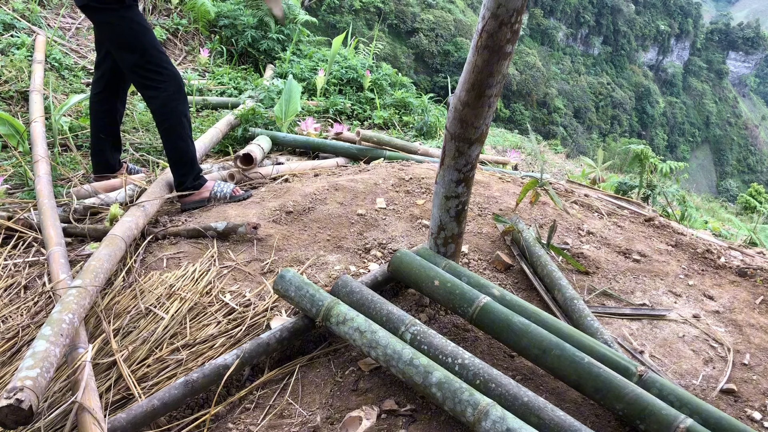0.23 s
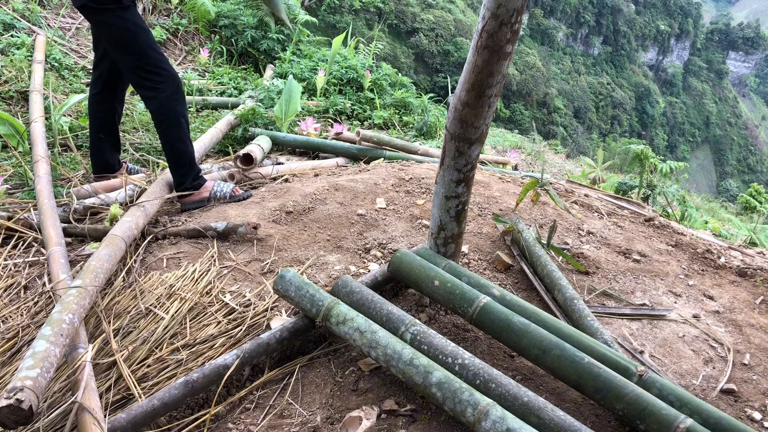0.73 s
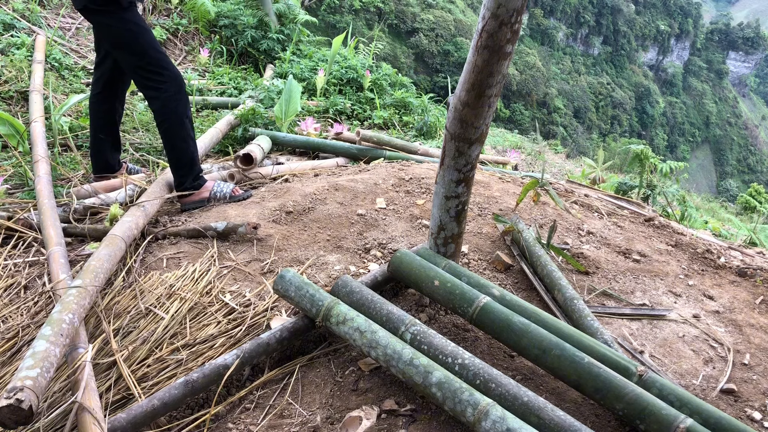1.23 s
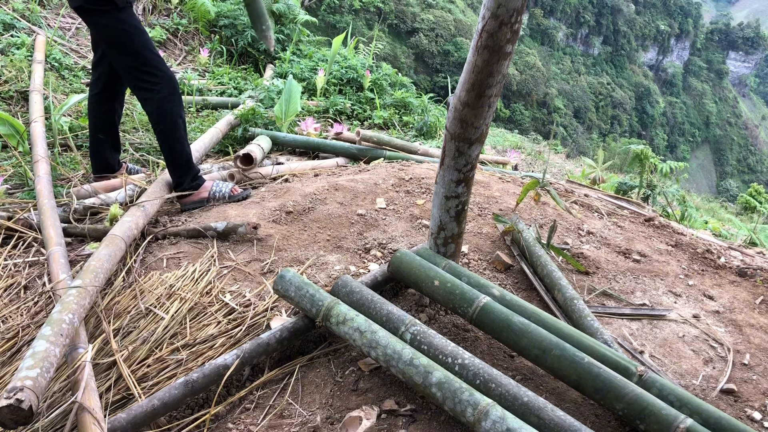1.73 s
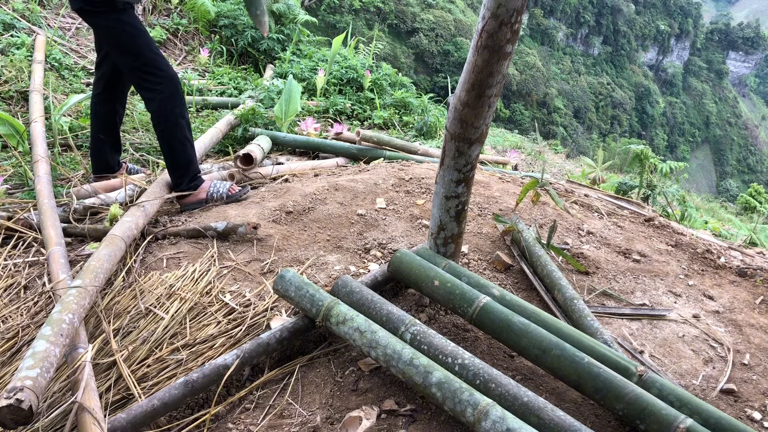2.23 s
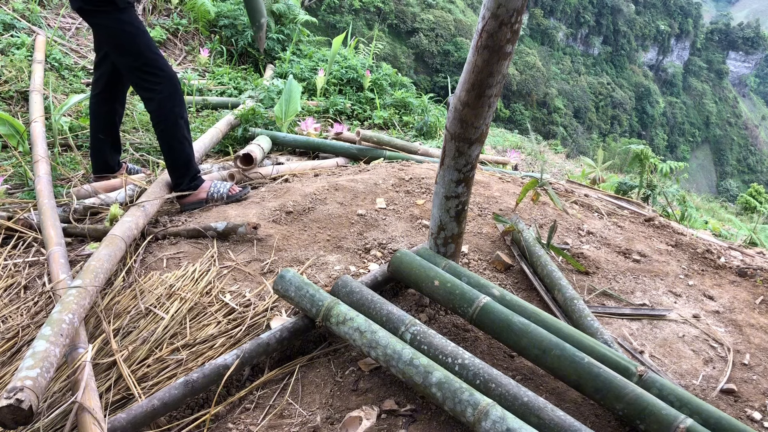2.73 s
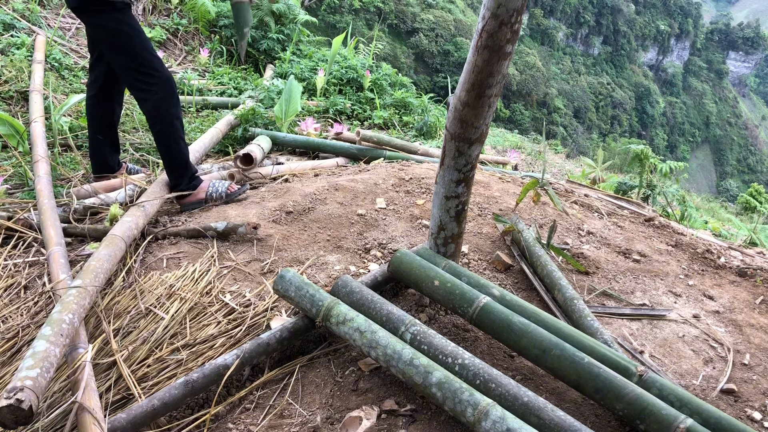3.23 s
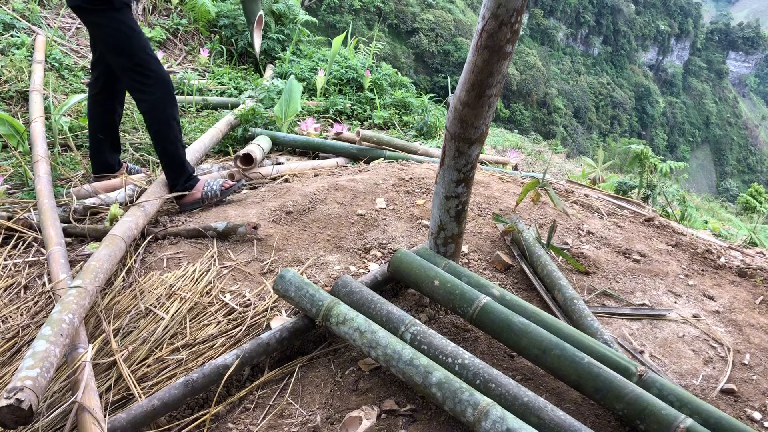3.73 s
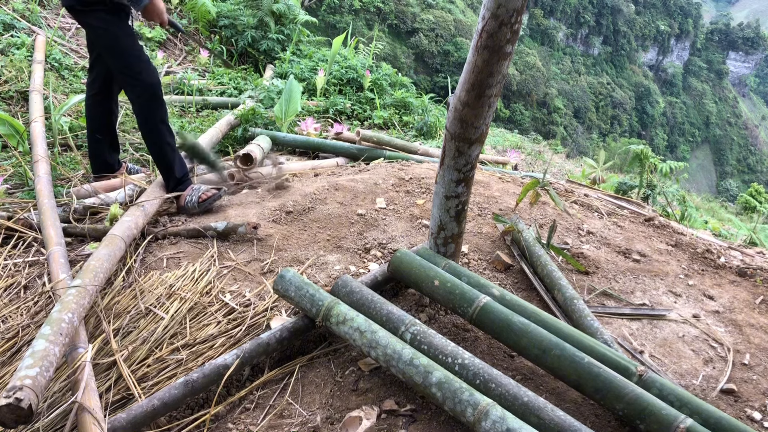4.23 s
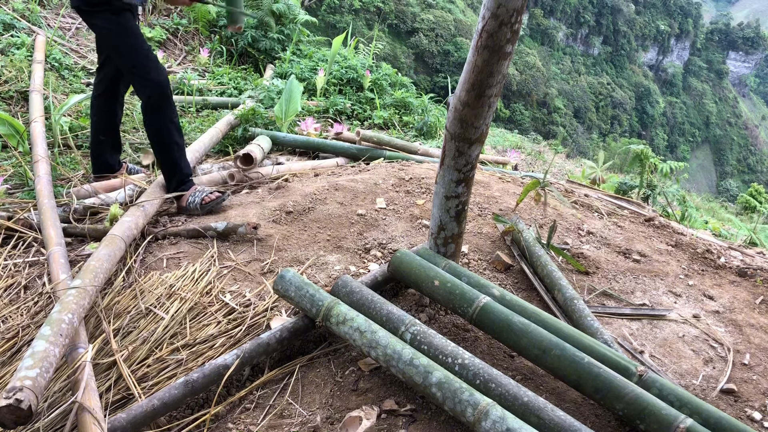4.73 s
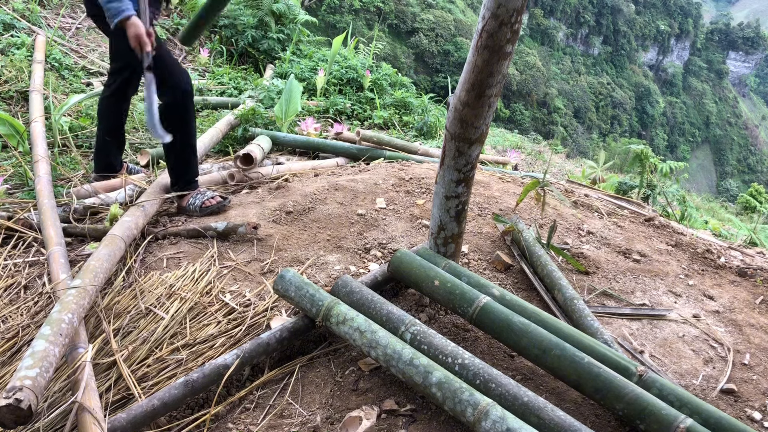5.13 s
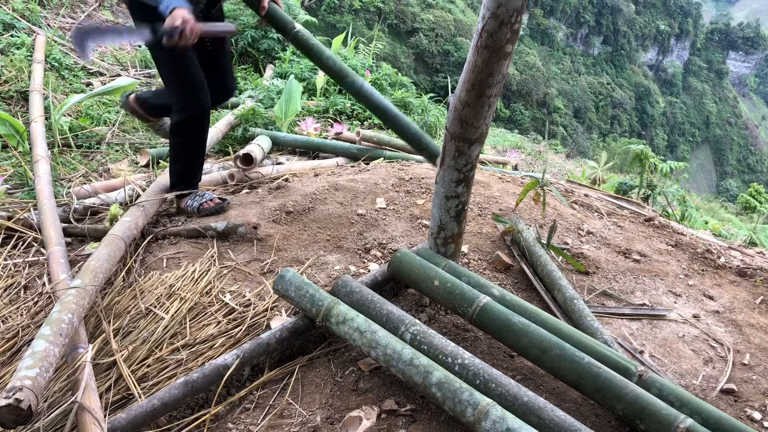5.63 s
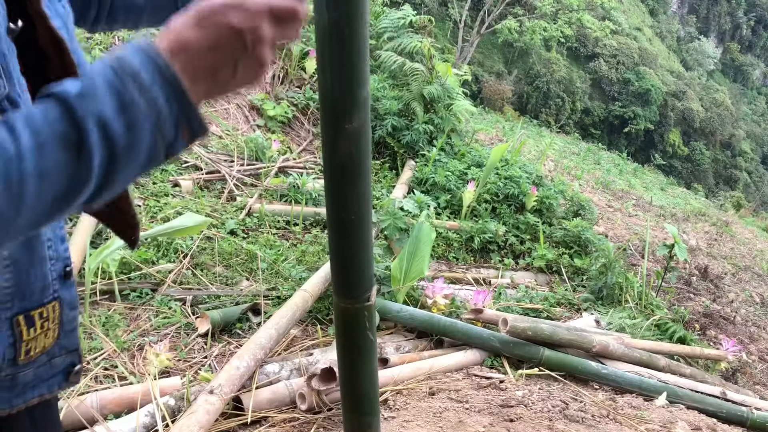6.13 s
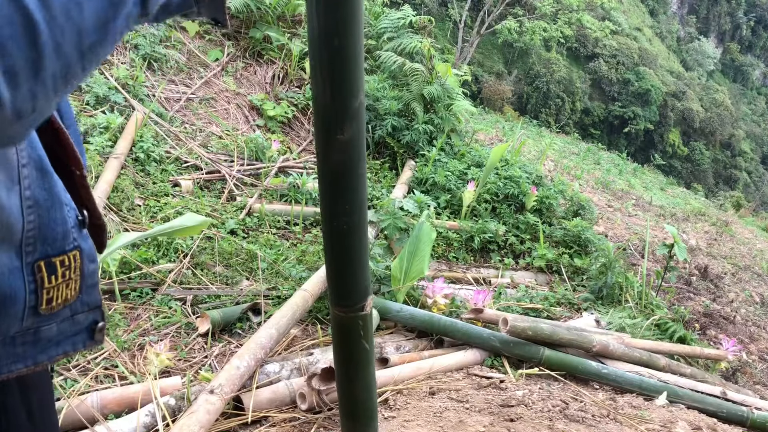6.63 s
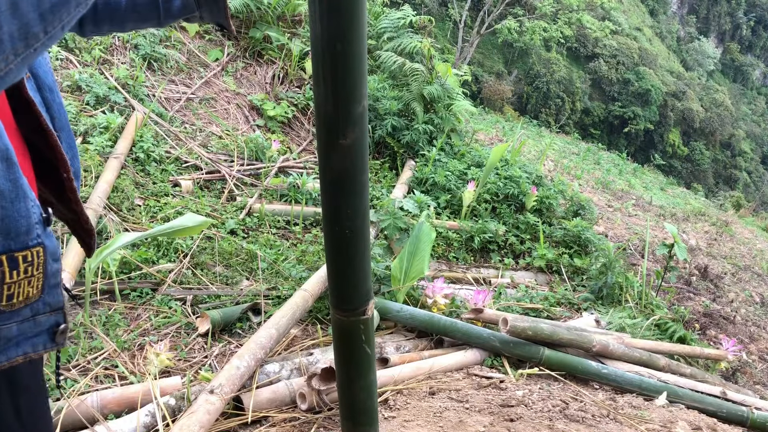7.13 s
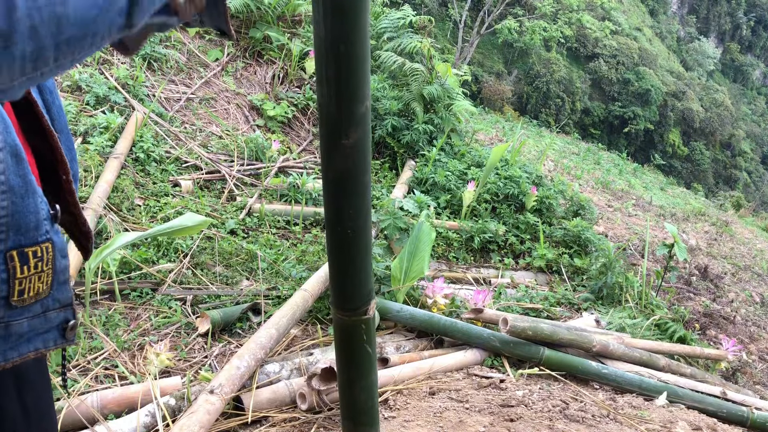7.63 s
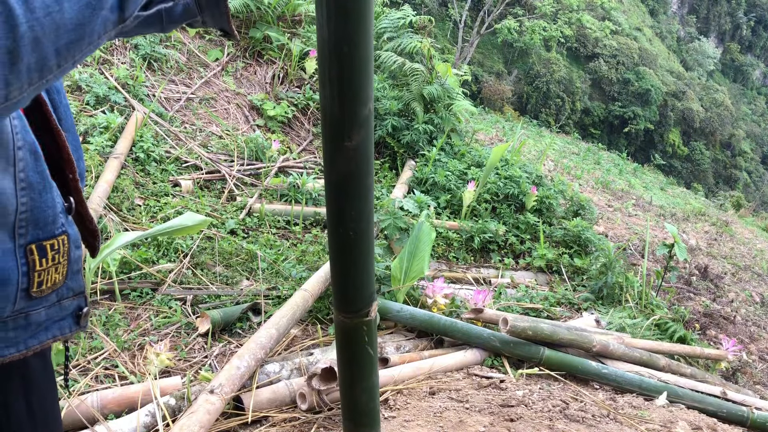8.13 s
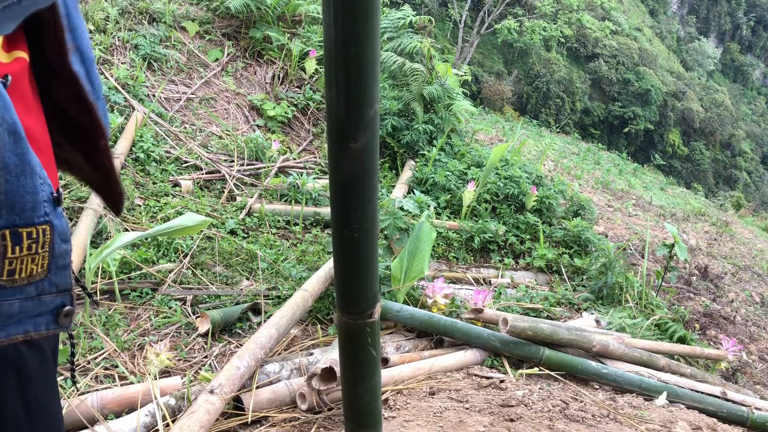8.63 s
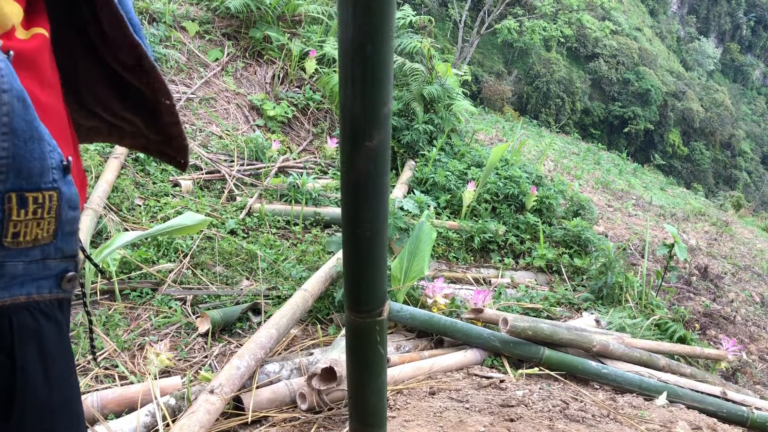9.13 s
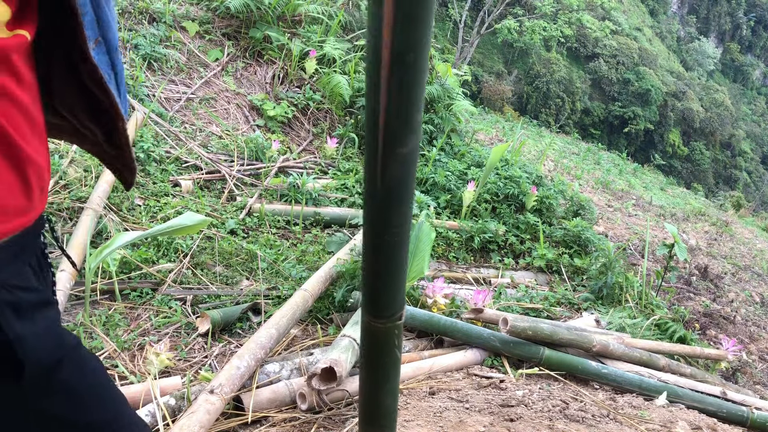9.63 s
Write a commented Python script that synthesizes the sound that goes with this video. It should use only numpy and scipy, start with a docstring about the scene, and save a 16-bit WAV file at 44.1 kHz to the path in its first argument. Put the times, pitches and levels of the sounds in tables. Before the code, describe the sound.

On an open hillside, a long knife chops green bamboo five times, about once a second, each blow a sharp crack with a hollow ring. A cut piece drops and bounces, a faint rooster crows far away and a pole drags briefly. After a lighter, closer chop and a flurry of birdsong, a second pole splits in bursts of snapping fibres. An insect trills faintly and wind puffs on the microphone.

```python
"""On an open hillside, wind puffs on the microphone and an insect trills. A long knife chops green bamboo:
the blade bites, the wall cracks, the hollow tube booms. Leaves rustle among small dry ticks, a songbird
whistles and a fly buzzes past. The fifth chop frees a piece that drops and bounces; a far rooster crows,
and a pole lands and drags on the pile. After a lighter, closer chop and a flurry of birdsong,
a second, upright pole is notched, then splits in a tearing run of snapping fibres."""
import sys
import numpy as np
from scipy import signal
from scipy.fft import rfft, irfft, next_fast_len
from scipy.io import wavfile
from scipy.ndimage import uniform_filter1d, map_coordinates

SR = 44100
rng = np.random.default_rng(int(sys.argv[2]) if len(sys.argv) > 2 else 0)


def inscribe(sig):
    """Save sig as 16-bit PCM at rate SR to the path in sys.argv[1].

    A 1-D sig is mono; a 2-D sig holds one channel per row.
    Samples are clipped to [-1, 1] before scaling.
    """
    pcm = np.round(np.clip(np.atleast_2d(sig).T, -1, 1) * 32767)
    wavfile.write(sys.argv[1], SR, pcm.astype(np.int16))


N = 435708
TIME = np.arange(N) / SR
AFTER = np.arange(SR // 2) / SR  # seconds after a blow

# noise colours: f/Hz, density/dB
WIND_COLOUR = [(15, -33), (30, -15.5), (60, -1), (130, -8), (250, -19.5), (500, -70.5)]  # low buffeting
VALLEY_COLOUR = [(80, -37.5), (150, 2), (500, -3.5), (1400, -11.5), (6000, -22.5), (9000, -48)]  # distant murmur
CRACK_COLOUR = [(250, -34.5), (500, -10.5), (1300, -10.5), (1900, -12.5), (3500, -9), (5500, -14.5),
                (8000, -24.5), (12000, -72.5)]  # body of a crack
SIZZLE_COLOUR = [(3200, -30.5), (5500, -11), (7500, -3), (10000, -9), (13500, -8), (15300, -8),
                 (16000, -14.5), (16900, -37.5)]  # its splintery top
NEAR_SIZZLE_COLOUR = [(3000, -27.5), (7000, -6.5), (11000, -6.5), (15000, -3.5), (15800, -2), (16600, -41)]  # that top, close by
LEAF_COLOUR = [(400, -27), (900, 1), (5000, -3.5), (10000, -4.5), (15300, 2), (15800, -3), (16000, -59.5)]  # near leaves
FOLIAGE_COLOUR = [(1500, -18.5), (4000, 0.5), (15800, -4), (16000, -56)]  # far foliage

# ringing modes: f/Hz, level/dB, t60/s
POLE_MODES = [(296, -3, 0.14), (569.7, -2.5, 0.052), (782, -8, 0.05), (910, -6.5, 0.068), (1190, -4, 0.061),
              (1312, -0.5, 0.1)]  # wall of the chopped pole
BLADE_MODES = [(4300, -3, 0.098), (6200, 0, 0.16), (9500, -5, 0.26), (10720, -3.5, .16), (11800, -5.5, .18),
               (13360, -12.5, .15)]  # steel of the knife
COLUMN_MODES = [(124, 0, .45)]  # air in the hollow pole
LOOSE_MODES = [(205.2, -7, 0.25), (382.2, -3.5, 0.25), (500, -5, 0.15), (589, -7, 0.32), (820, -3.5, 0.092),
               (1214, -5.5, 0.18)]  # loose, cut bamboo
UPRIGHT_MODES = [(155.7, -21, 0.43), (422, -9.5, 0.14), (732, -11.5, 0.0896), (963, 0.5, 0.04),
                 (1196, -4, 0.104), (1669, -5, 0.063)]  # wall of the upright pole

# ambience faders: t/s, wind/dB, valley/dB
AIR_LEVELS = [(0, -65, -68.5), (4.5, -72.5, -66), (6, -74.5, -68.5), (8.9, -75, -69.5), (9.5, -89, -59),
              (9.88, -54.5, -68.5)]
# eddies hitting the microphone: peak t/s, level/dB, width/s
WIND_PUFFS = [(0.299, -39, 0.019), (.76, -51.5, 0.025), (4.389, -50, 0.016), (6.106, -49, 0.014),
              (6.799, -42, 0.011), (6.867, -47.5, 0.0078), (6.948, -44.5, 0.022), (7.626, -32.5, 0.012),
              (9.75, -48.5, 0.019)]
# insect bouts: start/s, end/s, level/dB
TRILL_BOUTS = [(.001, 0.331, -63.5), (1.25, 3.27, -64), (3.753, 4.33, -69), (5.394, 5.9, -71),
               (6.325, 8.086, -66.5), (8.738, 9.1, -67)]
# full swings: t/s, level/dB, treble over level/dB, lead of the first touch/s, air column/dB
KNIFE_CHOPS = [(0.2037, -11, -6.5, .0182, -32), (1.1558, -11.5, -4.5, .0168, -29.5),
               (2.1279, -12, -5.5, .0203, -33), (3.0338, -11, -6, .0185, -33),
               (3.961, -12.5, -3, 0.019, -22), (7.3194, -23, 0, .002, -33.5)]
# light blade contacts: t/s, crack/dB, treble/dB, steel/dB
KNIFE_TAPS = [(0.2503, -36.5, -31, -79), (0.6964, -56.5, -51.5, -66.5), (2.506, -49, -50, -62.5),
              (3.3368, -48, -43, -63), (3.384, -39.5, -66, -65), (3.3997, -48, -48.5, -52.5)]
# leaves and bark brushed: start/s, peak/s, end/s, level/dB
LEAF_SWELLS = [(0.293, 0.389, 1.23, -66.5), (1.236, 1.337, 2.1, -65), (2.176, 2.451, 2.45, -60),
               (3.103, 3.25, 3.4, -61), (4.078, 4.104, 4.57, -56), (4.56, 4.633, 4.98, -57),
               (5.18, 5.314, 6.1, -66), (5.945, 6.082, 7.1, -68), (8.84, 8.952, 22, -66.5),
               (9.15, 9.37, 10.33, -52.5)]
# small dry ticks of light knife nicks, chips and twigs: t/s, crack/dB, treble/dB
DRY_TICKS = [(0.327, -46.5, -54), (1.0413, -49, -49.5), (2.41, -39, -72), (2.448, -52, -64),
             (2.722, -52.5, -70), (3.305, -44, -71), (3.486, -50.5, -72), (4.079, -36.5, -45),
             (4.0903, -37, -45), (4.1118, -35, -36), (4.607, -41, -51.5), (4.8173, -46, -48.5),
             (6.068, -32, -41)]
# bird notes that dip and come back: t/s, length/s, edge f/Hz, lowest f/Hz, level/dB
BIRD_DIPS = [(0.478, 0.18, 3480, 2630, -72), (7.985, 0.099, 3300, 2600, -75)]
# bird notes that glide and settle: t/s, length/s, from f/Hz, to f/Hz, level/dB
BIRD_GLIDES = [(1.902, 0.027, 5040, 5100, -67), (6.731, 0.056, 3750, 3810, -72.5),
               (6.984, 0.04, 3020, 3500, -67), (7.343, 0.081, 3880, 4260, -56),
               (7.589, 0.042, 6750, 3840, -57.5), (7.689, 0.079, 6200, 2330, -62),
               (7.761, 0.042, 7160, 3950, -57.5), (7.83, 0.036, 6570, 2220, -65.5),
               (7.949, 0.048, 2710, 3790, -61), (8.01, 0.055, 6550, 2400, -60),
               (8.13, 0.061, 2320, 3950, -63.5), (8.209, 0.027, 4130, 2610, -73),
               (8.284, 0.018, 4720, 2830, -69), (8.313, 0.018, 3900, 5510, -68)]
# bird warbles: level/dB, then turning points (t/s, f/Hz)
BIRD_WARBLES = [(-59, (7.17, 3900), (7.187, 4150), (7.203, 3200), (7.235, 4500)), (-56, (7.452, 4500),
                (7.472, 4700), (7.49, 3300), (7.525, 2800)), (-58, (7.618, 4800), (7.643, 5200),
                (7.661, 2900), (7.68, 4000), (7.70, 2500)), (-60, (7.868, 6300), (7.888, 4800),
                (7.903, 5300), (7.92, 3400), (7.942, 2600))]
# fly passes: start/s, end/s, wingbeat from f/Hz, to f/Hz, level/dB
FLY_PASSES = [(0.805, 1.132, 290.5, 299, -77.5), (3.681, 3.732, 334, 310, -59.5),
              (3.749, 3.968, 292, 351, -63), (8.008, 8.425, 265.7, 269, -75.5),
              (8.683, 9.097, 274.4, 253, -72.5)]
# hollow bamboo knocks: a cut piece drops and bounces, then a pole lands on the pile:
# t/s, crack/dB, wall/dB, favoured f/Hz, share of full ring time
HOLLOW_KNOCKS = [(3.963, -52, -19, 413, 0.9), (4.2431, -24.5, -15.5, 386, 0.66),
                 (4.3065, -46.5, -29, 296, 0.61), (4.4992, -50, -36.5, 500, 0.76),
                 (4.701, -51, -45, 695, 0.39), (5.696, -49.5, -44, 652, 0.5)]
# a pole dragged over the pile: start/s, end/s, level/dB
POLE_DRAG = (5.68, 5.905, -56)
# the far crow: t/s, f/Hz, level/dB, third partial over the first/dB
CROW_CONTOUR = [(5.02, 490, -72, -16), (5.07, 500, -67, -19), (5.12, 505, -76, -6), (5.21, 512, -72, 7),
                (5.29, 515, -74, -4), (5.55, 530, -72, -12), (5.7, 510, -72, -1), (5.9, 445, -70, -18)]
# notches and snaps in the upright pole: t/s, crack/dB, treble/dB
UPRIGHT_SNAPS = [(8.4165, -48.5, -47.5), (8.4401, -41, -39), (8.7924, -38.5, -45.5), (8.799, -22, -24.5),
                 (9.109, -23.5, -22), (9.1154, -28.5, -30), (9.1235, -35.5, -29.5), (9.1341, -21, -26),
                 (9.1545, -22, -19), (9.189, -26.5, -30.5), (9.2307, -21.5, -26), (9.4952, -37, -42),
                 (9.5262, -29.5, -30.5), (9.5329, -24.5, -19.5), (9.5387, -20.5, -21), (9.556, -24, -27),
                 (9.571, -28, -26), (9.59, -27.5, -20.5), (9.612, -26.5, -22)]
# the running split: start/s, end/s, start level/dB, end level/dB, groan f/Hz, groan/dB
UPRIGHT_TEARS = [(8.801, 8.875, -22, -50, 420, -39.5), (9.155, 9.233, -28, -30, 207, -31.5),
                 (9.535, 9.59, -27, -32.5, 262, -40.5), (9.43, 9.52, -60, -51.5, 250, -43.5)]

CHIRPS_PER_S = 48.7
# over the level of the swing: the first touch of the edge, then the full bite
TOUCH_DB, TOUCH_TREBLE_DB, TOUCH_WALL_DB, TOUCH_STEEL_DB = -24.5, -15.5, -43, -34
CHOP_WALL_DB, CHOP_STEEL_DB = -6, -39.5
TAP_WALL_DB, SPLIT_WALL_DB = -9.5, -5.5  # over the crack
FLY_SECOND_DB, ROOSTER_SECOND_DB = -8.5, -6  # second partial over the first
LANDS_S, LANDED_T60 = 4.078, 0.086  # the freed piece meets the ground and its ring is choked
CLOSE_FROM_S = 5.92  # from here on the chopping is close to the microphone
LOW_CUT_HZ, TOP_HZ = 30, 16900


def amp(db):
    """Decibels to linear gain."""
    return 10 ** (np.asarray(db) / 20)


def unit(x):
    """Scale to rms 1."""
    return x / np.sqrt(np.mean(x ** 2) + 1e-20)


def ramp(seconds):
    """A straight rise from 0 to 1."""
    return np.linspace(0, 1, round(seconds * SR))


def curves(rows):
    """Automation: one value per sample for each column after the time."""
    times, *columns = np.transpose(rows)
    return [np.interp(TIME, times, column) for column in columns]


def wobble(rate):
    """A smooth random curve, rate knots a second."""
    return map_coordinates(rng.standard_normal(int(N * rate / SR) + 4), [TIME * rate])


def noise(colour, size, patchy_db=0):
    """Coloured noise of rms 1, with patches of random gain across time and frequency."""
    cells = signal.stft(rng.standard_normal(size + 1024), nperseg=512)[2]
    patches = uniform_filter1d(uniform_filter1d(rng.standard_normal(cells.shape), 6, 0), 10, 1)
    patchy = signal.istft(cells * amp(patchy_db * unit(patches)), nperseg=512)[1][:size]
    knots_hz, db = np.transpose(colour)
    padded = next_fast_len(size)
    hz = np.fft.rfftfreq(padded, 1 / SR)
    eq = amp(np.interp(np.log(hz + 1), np.log(knots_hz + 1), db))
    return unit(irfft(rfft(patchy, padded) * eq, padded)[:size])


def add(track, s, sound):
    """Mix a sound in at time s."""
    part = track[max(round(s * SR), 0):][:len(sound)]
    part += sound[:len(part)]


def air():
    """The bed: wind buffeting the microphone over the murmur of the valley."""
    wind_db, valley_db = curves(AIR_LEVELS)
    wind = amp(wind_db + 5 * wobble(13) + 1.3 * wobble(10)) * noise(WIND_COLOUR, N)
    valley = amp(valley_db + 0.87 * wobble(4.9)) * noise(VALLEY_COLOUR, N, patchy_db=2)
    t = np.arange(-SR // 10, SR // 10) / SR
    for s, db, width in WIND_PUFFS:  # an eddy pushes the diaphragm for a cycle or two
        push = np.sin(8.8 * t / width) + 0.82 * noise(WIND_COLOUR, len(t))
        add(wind, s + t[0], amp(db) * np.exp(-(t / width) ** 2) * push)
    return wind + valley


def insect():
    """Each wing stroke is a short falling chirp; far neighbours blur to a thin hum."""
    out, u = np.zeros(N), ramp(0.016)
    for start, end, db in TRILL_BOUTS:
        for s in np.arange(start, end, 1 / CHIRPS_PER_S):
            # bouts after the first swell in and climb to pitch
            swell = min(1, 0.3 + (s - start) / 0.29) if start > .1 else 1
            sweep_hz = 7200 + 600 * swell - (500 + 700 * swell) * u ** 1.2
            phase = 2 * np.pi * (np.cumsum(sweep_hz) / SR + rng.random())
            add(out, s, swell * amp(db + rng.normal(0, 2.3)) * np.sin(np.pi * u) * np.sin(phase))
    neighbours = amp(-89 + 2.5 * wobble(3)) * noise([(6200, -50), (6900, 0), (7600, -50)], N)
    return out + neighbours


def trees(x, t60, wet_db):
    """Add the smear that trunks and leaves scatter back."""
    tail = rng.standard_normal(len(AFTER)) * amp(-60 * AFTER / t60)
    return x + amp(wet_db) * signal.fftconvolve(x, tail / np.linalg.norm(tail))[:N]


def ring(modes, cycles, rough):
    """Damped modes build over some cycles, anew each blow; wet fibre roughens phase and pitch."""
    out = 0
    for hz, db, t60 in modes:
        drift = rough * np.cumsum(rng.standard_normal(len(AFTER))) * np.sqrt(hz / SR)
        phase = 2 * np.pi * hz * rng.normal(1, 0.012 * rough) * AFTER + drift
        attack = 1 - np.exp(-AFTER * hz / cycles)
        decay = amp(rng.normal(db, 2.5) - 60 * AFTER / t60)
        out = out + attack * decay * np.sin(phase)
    return out


def splinters(size, per_s, life_s):
    """A crackling gain: fibres snap at random, each dying fast, over a steady fraying."""
    snaps = (rng.random(size) < per_s / SR) * rng.uniform(0, 1.5, size=size)
    return 0.66 + 0.98 * signal.lfilter([1], [1, -np.exp(-1 / (life_s * SR))], snaps)


def crack(db, treble_db, t60, sizzle=SIZZLE_COLOUR):
    """The edge sinks in, fibres part in a spike and splinter on, treble dying first."""
    bite = np.clip(AFTER / 0.0011, 0, 1) ** 2
    spike = amp(6.5 - 60 * AFTER / 0.0044)
    fray = splinters(len(AFTER), per_s=90, life_s=0.0058)
    fall_db = -60 * AFTER / t60
    scatter = amp(-46.5 - 60 * AFTER / 0.98)  # the hillside sends a little back
    body_shape = spike + fray * (amp(fall_db) + amp(-5 + fall_db / 3.2)) + scatter
    top_shape = 2.6 * spike + fray * (amp(fall_db / 0.73) + amp(-13.5 + fall_db / 3.8))
    body = amp(db - 6) * body_shape * noise(CRACK_COLOUR, len(AFTER))
    top = amp(treble_db - 3) * top_shape * noise(sizzle, len(AFTER))
    return bite * (body + top)


def contact(db, treble_db, wall_db, steel_db, close=False):
    """One blade contact cracks the wall and rings pole and steel; close by, the crack is tighter."""
    wall = amp(wall_db) * ring(POLE_MODES, cycles=2.5, rough=0.33)
    t60, sizzle = (0.026, NEAR_SIZZLE_COLOUR) if close else (0.04, SIZZLE_COLOUR)
    snap = crack(db, treble_db, t60, sizzle)
    steel = amp(steel_db) * ring(BLADE_MODES, cycles=6, rough=0.015)
    return snap + wall + steel


def knife():
    """The edge touches, then bites home and sets the air column booming; light taps fall between."""
    out = np.zeros(N)
    for s, db, treble_db, lead, column_db in KNIFE_CHOPS:
        touch = contact(db + TOUCH_DB, db + TOUCH_TREBLE_DB, db + TOUCH_WALL_DB, db + TOUCH_STEEL_DB)
        boom = amp(column_db) * ring(COLUMN_MODES, cycles=6, rough=0.4)
        bite = contact(db, db + treble_db, db + CHOP_WALL_DB, db + CHOP_STEEL_DB, s > CLOSE_FROM_S)
        add(out, s - lead, touch)
        add(out, s, bite + boom)
    for s, db, treble_db, steel_db in KNIFE_TAPS:
        add(out, s, contact(db, treble_db, db + TAP_WALL_DB, steel_db))
    return out


def leaves():
    """Grainy brushing that swells and fades, over a faint flickering hiss of foliage."""
    swells = sum(amp(db) * np.interp(TIME, times, [0, 1, 0]) ** 2 for *times, db in LEAF_SWELLS)
    grain = amp(1.5 * wobble(38) + 1.76 * wobble(230))
    near = swells * grain * noise(LEAF_COLOUR, N, patchy_db=3)
    far = amp(-79 + 1.7 * wobble(6.9) + 0.55 * wobble(2.9)) * noise(FOLIAGE_COLOUR, N, patchy_db=2.3)
    return near + far


def ticks():
    """Small dry ticks with no ring: light knife nicks, chips and twigs."""
    out = np.zeros(N)
    for s, db, treble_db in DRY_TICKS:
        add(out, s, crack(db, treble_db, t60=0.042))
    return out


def songbird():
    """Pure whistles that glide, dip and warble."""
    out, notes = np.zeros(N), []
    for s, length, from_hz, to_hz, db in BIRD_GLIDES:  # fast at first, then settling
        notes.append((s, db, to_hz + (from_hz - to_hz) * (1 - ramp(length)) ** 1.9))
    for s, length, edge_hz, low_hz, db in BIRD_DIPS:
        notes.append((s, db, low_hz + (edge_hz - low_hz) * (2 * ramp(length) - 1) ** 2))
    for db, *turns in BIRD_WARBLES:
        times, hz = np.transpose(turns)
        zigzag = np.interp(np.arange(times[0], times[-1], 1 / SR), times, hz)
        notes.append((times[0], db, uniform_filter1d(zigzag, size=300, mode="nearest")))
    for s, db, pitch in notes:
        phase = 2 * np.pi * np.cumsum(pitch) / SR
        add(out, s, amp(db) * np.hanning(len(pitch)) ** 0.31 * np.sin(phase))
    return out


def drone(rows, waver, flutter_db):
    """Harmonics on a wavering pitch, from the first row to the last: t/s, f/Hz, each level/dB."""
    hz, *levels = curves(rows)
    phase = 2 * np.pi * np.cumsum(hz * (1 + waver * wobble(40))) / SR
    gate = np.clip(np.minimum(TIME - rows[0][0], rows[-1][0] - TIME) / 0.011, 0, 1)
    tone = sum(amp(db + flutter_db * wobble(25)) * np.sin(k * phase) for k, db in enumerate(levels, 1))
    return gate * np.sqrt(2) * tone


def fly():
    """The wingbeat and its octave buzz by, sliding in pitch on each pass."""
    out = np.zeros(N)
    for start, end, from_hz, to_hz, db in FLY_PASSES:
        levels = (db, db + FLY_SECOND_DB)
        out += drone([(start, from_hz, *levels), (end, to_hz, *levels)], waver=0.0059, flutter_db=2.5)
    return out


def knocks():
    """Where loose bamboo lands decides which of its modes speak and how long they ring."""
    out = np.zeros(N)
    for s, db, wall_db, centre_hz, share in HOLLOW_KNOCKS:
        modes = [(hz, level - 7 * abs(np.log2(hz / centre_hz)), t60 * share)
                 for hz, level, t60 in LOOSE_MODES]
        hollow = ring(modes, cycles=1.3, rough=0.3)
        if s < LANDS_S:
            hollow *= amp(-60 * np.clip(s + AFTER - LANDS_S, 0, 1) / LANDED_T60)
        add(out, s, crack(db, db - 12, t60=0.043) + amp(wall_db) * hollow)
    return out


def rooster():
    """A far crow: three fluttering harmonics rise in pitch, then sag."""
    crow = [(s, hz, db, db + ROOSTER_SECOND_DB, db + third_db) for s, hz, db, third_db in CROW_CONTOUR]
    return drone(crow, waver=0.009, flutter_db=4.5)


def drag():
    """A pole bumps along the pile, and the rubbing stirs its damped, hollow modes."""
    out = np.zeros(N)
    start, end, db = POLE_DRAG
    size = round((end - start) * SR)
    rub = rng.standard_normal(size) * splinters(size, per_s=25, life_s=0.015) ** 2
    hollow = ring([(hz, level, 0.04) for hz, level, _ in LOOSE_MODES[1:5]], cycles=0.55, rough=1)
    add(out, start, amp(db) * unit(signal.fftconvolve(rub, hollow)[:size]))
    return out


def upright_pole():
    """Blows crack and ring the pole; its split is a dense run of snapping fibres over a rising groan."""
    out, fibres = np.zeros(N), np.zeros(N)
    for s, db, treble_db in UPRIGHT_SNAPS:
        snap = crack(db, treble_db, t60=0.036, sizzle=NEAR_SIZZLE_COLOUR)
        add(out, s, snap + amp(db + SPLIT_WALL_DB) * ring(UPRIGHT_MODES, cycles=1.5, rough=0.79))
    for start, end, start_db, end_db, hz, groan_db in UPRIGHT_TEARS:
        u = ramp(end - start)
        level = amp(start_db + (end_db - start_db) * u) * np.sqrt(1 - u ** 8)
        crackle = rng.standard_normal(len(u)) * splinters(len(u), per_s=370, life_s=0.0015)
        add(fibres, start, level * crackle)
        groan = np.sin(2 * np.pi * np.cumsum(hz * (0.778 + 0.415 * u)) / SR)
        add(out, start, amp(groan_db + 3 * wobble(57)[:len(u)]) * np.sin(np.pi * u) * groan)
    fibres -= uniform_filter1d(fibres, size=80)  # thin fibres move no bass
    damped = [(hz, db, 0.5 * t60) for hz, db, t60 in UPRIGHT_MODES]  # the open split damps the wall
    wall = ring(damped, cycles=0.9, rough=0.483)
    return out + fibres + amp(-1) * signal.fftconvolve(fibres, wall / np.linalg.norm(wall))[:N]


def scene():
    """The mono mix: bamboo up front, animals and air behind."""
    bamboo = knife() + upright_pole() + knocks() + drag() + ticks() + leaves()
    animals = fly() + rooster() + trees(insect(), t60=0.11, wet_db=-9.5)
    animals += trees(songbird(), t60=0.25, wet_db=-10)
    return (bamboo + animals + air())[None]


def record(dry):
    """The microphone rolls off the deepest bass and keeps nothing above its band limit."""
    padded = next_fast_len(N + SR // 2)
    hz = np.fft.rfftfreq(padded, 1 / SR)
    low_cut = 1j * hz / (LOW_CUT_HZ + 1j * hz)
    return irfft(rfft(dry, padded) * low_cut * (hz < TOP_HZ), padded)[..., :N]


dry = scene()
out = record(dry)
inscribe(out)
```